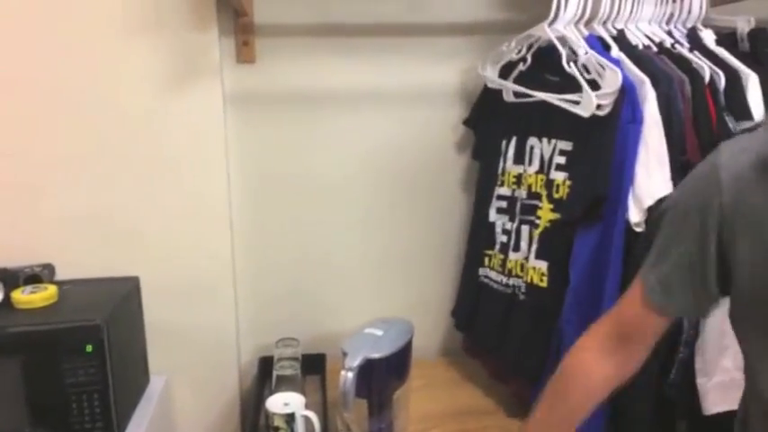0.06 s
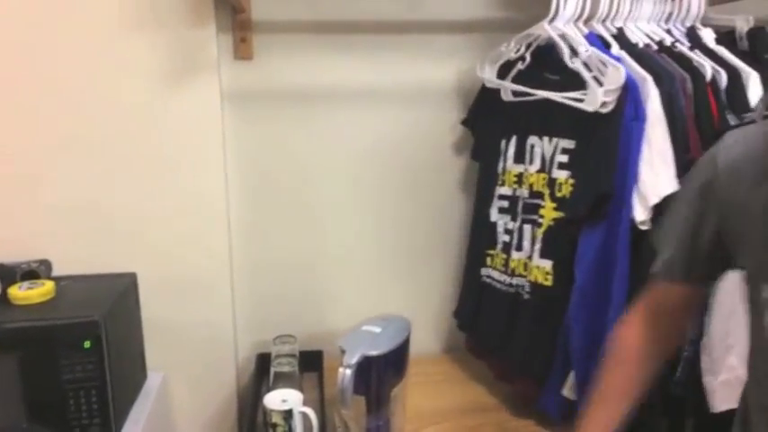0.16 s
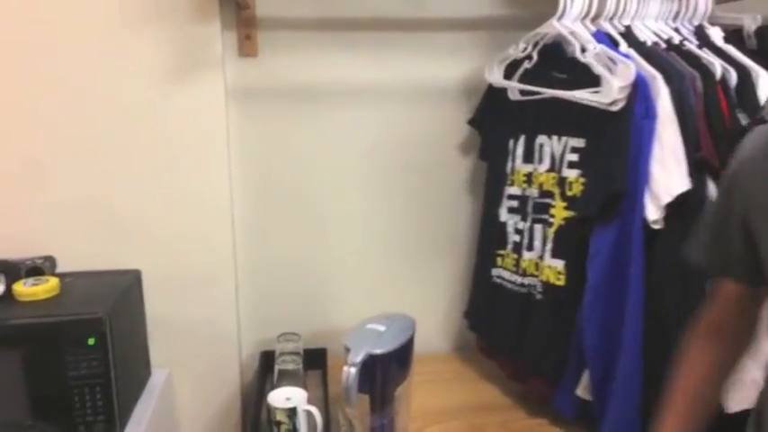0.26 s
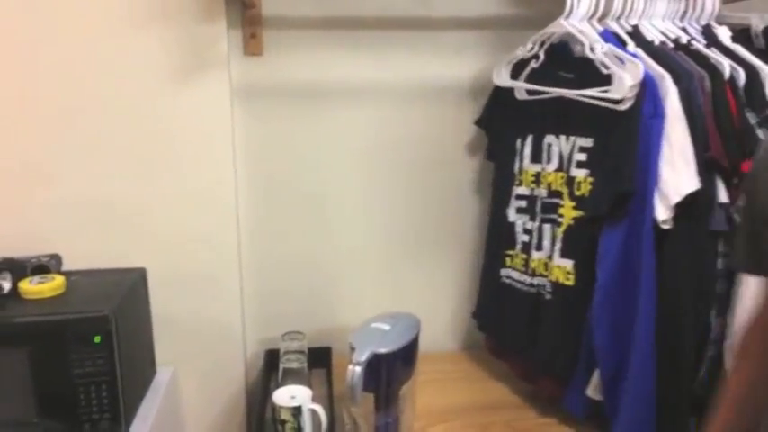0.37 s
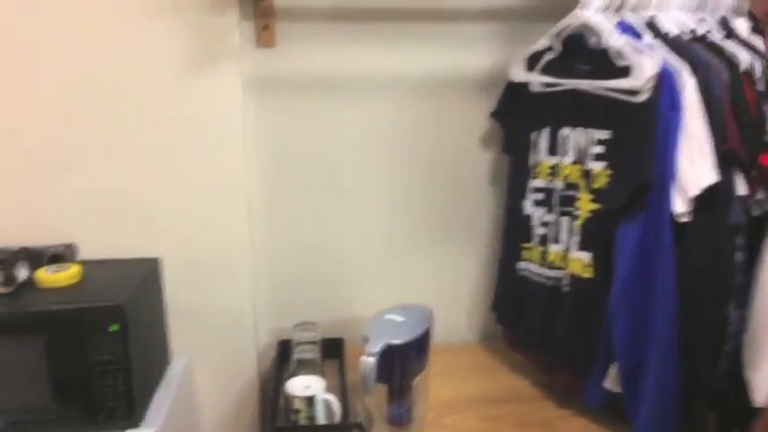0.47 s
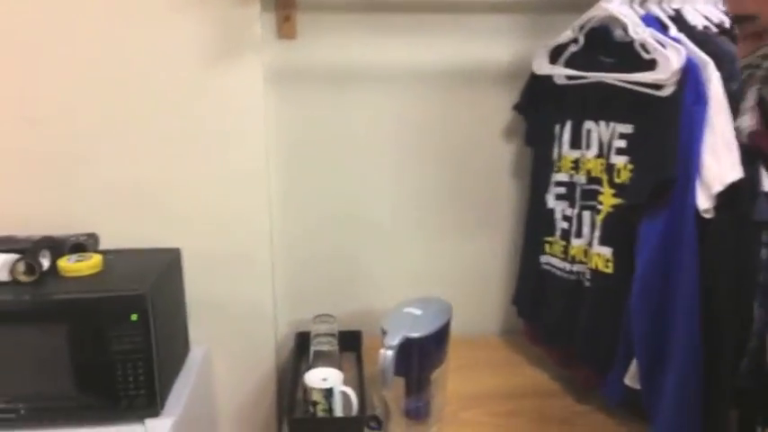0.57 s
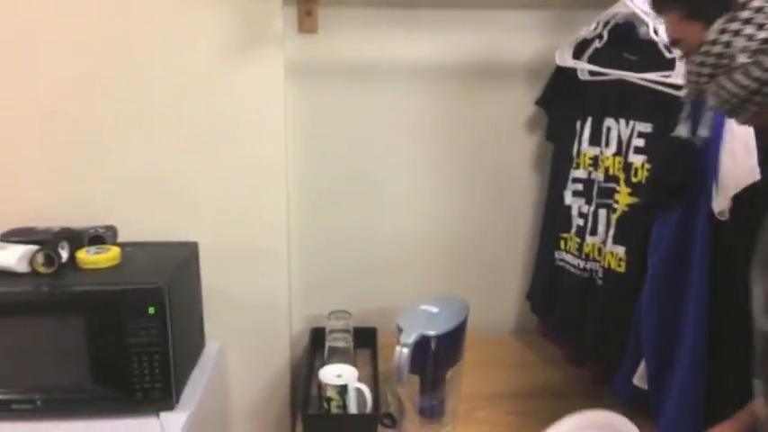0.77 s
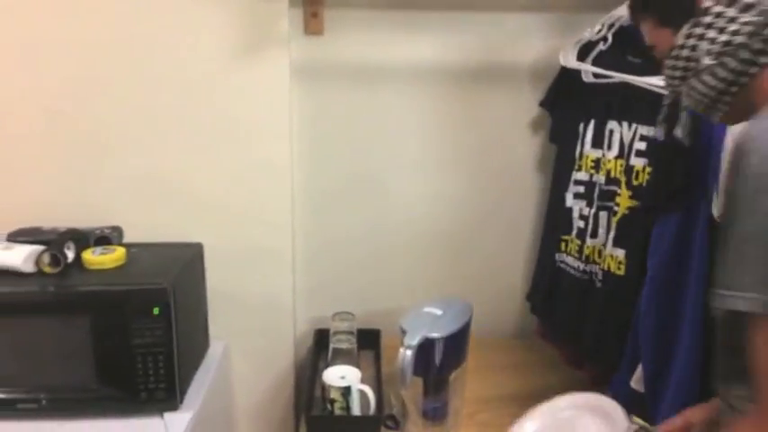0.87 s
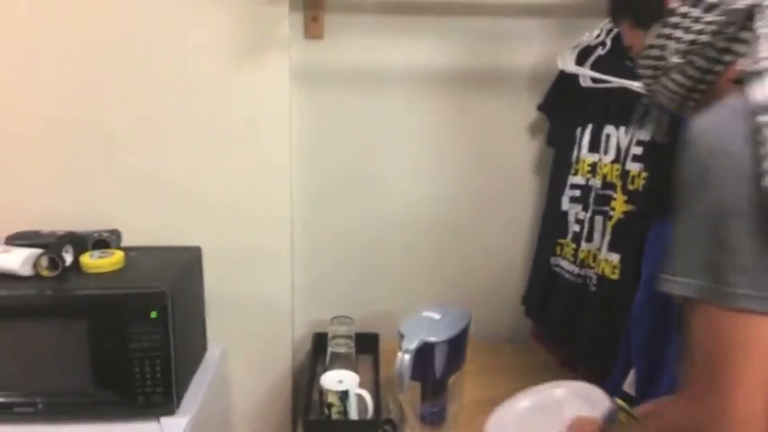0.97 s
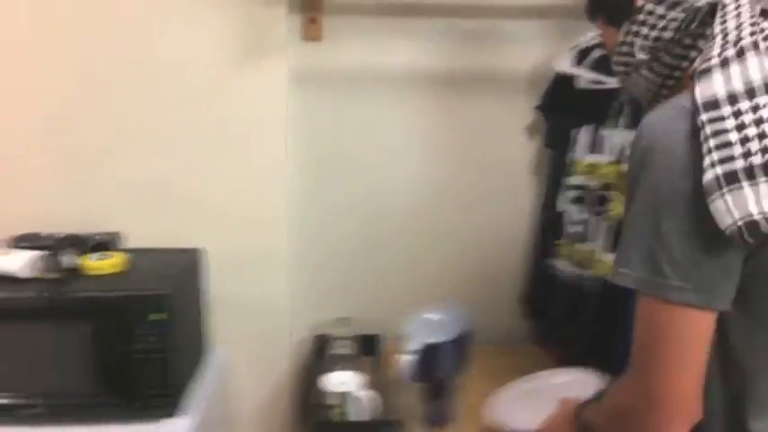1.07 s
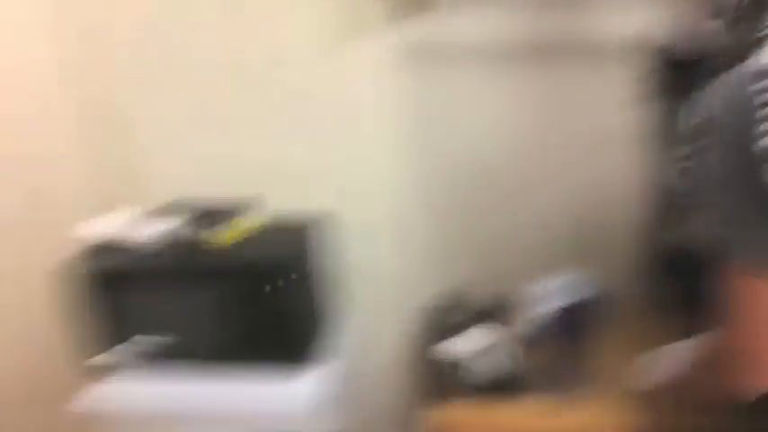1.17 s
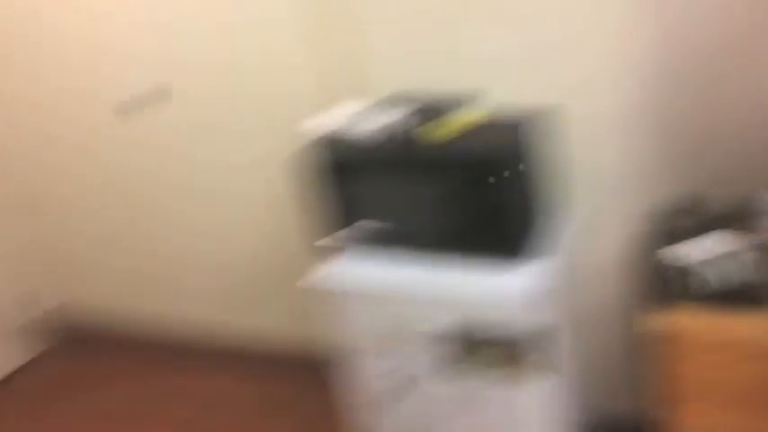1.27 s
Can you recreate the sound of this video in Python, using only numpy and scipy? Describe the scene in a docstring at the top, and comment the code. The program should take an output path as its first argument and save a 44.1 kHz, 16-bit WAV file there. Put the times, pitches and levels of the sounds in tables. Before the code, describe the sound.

Hangers pushed aside on a closet rod: bright clatter, a hollow wooden knock, then fading ticks

```python
"""Plastic clothes hangers are pushed aside on a metal closet rod, heard from across a small, live room.
A steady low rumble (filtered noise) lies underneath, and hooks slide faintly (bursts of tiny slips).
The hooks clack and chatter on the rod and the plastic shoulders bump (filtered clicks, ringing metal).
After more bright scraping, something wooden takes a hollow knock (softened clicks, ringing wood),
while the hangers rattle; then they settle with fainter ticks and slides."""
import sys
import numpy as np
from scipy import signal
from scipy.fft import rfft, irfft
from scipy.io import wavfile

SR = 44100
rng = np.random.default_rng(int(sys.argv[2]) if len(sys.argv) > 2 else 0)


def materialize(psi):
    """Save the field psi as 16-bit PCM at rate SR to the path in sys.argv[1].

    A 1-D psi becomes a single channel; in a 2-D psi each row is a channel.
    """
    bounded = np.clip(np.atleast_2d(psi).T, -1, 1)
    quanta = np.round(bounded * 32767).astype(np.int16)
    wavfile.write(sys.argv[1], SR, quanta)


N = 57330  # length in samples, 1.3 s
T = np.arange(N) / SR  # time in seconds


def from_db(db):
    """Turn decibels into a factor that multiplies the sound."""
    return 10 ** (np.asarray(db) / 20)


def at_hz(points, hz):
    """Read every column of a table at the given frequencies, on a log-frequency axis."""
    known, *columns = np.transpose(points)
    log_hz = np.log(np.maximum(hz, 1))
    return [np.interp(log_hz, np.log(known), column) for column in columns]


def convolve(x, response):
    """Start a copy of the response at every sample of x, scaled by that sample, and add them up."""
    return signal.fftconvolve(x, response)[:N]


def unit_energy(x):
    """Scale a sound so that its squared samples add up to one."""
    return x / np.sqrt(np.sum(x ** 2) + 1e-20)


def decay(t60):
    """Fade that loses 60 dB in t60 seconds."""
    return np.exp(-np.log(1000) * T / max(t60, 1e-3))


def coloured(x, colour, size=16384):
    """Filter a sound to a colour table, with a unit-energy response that never starts early."""
    db, = at_hz(colour, np.arange(size // 2 + 1) * SR / size)
    # keeping one side of the cepstrum gives minimum phase: energy comes as early as possible
    cepstrum = irfft(np.log(from_db(db)))
    spectrum = np.exp(rfft(2 * cepstrum[:size // 2], size))
    return convolve(x, unit_energy(irfft(spectrum)))


def clicks(rows):
    """One single-sample impulse for each (time [s], strength [dB]) row."""
    out = np.zeros(N)
    for time_s, db in rows:
        out[int(time_s * SR)] += from_db(db)
    return out


def ringing(modes, swell_s):
    """Vibrations of a solid body: sine waves that swell briefly and die away."""
    rings = np.zeros(N)
    for hz, db, t60 in modes:
        tone = np.sin(2 * np.pi * (hz * T + rng.random()))
        rings += from_db(db) * decay(t60) * tone
    return rings * (1 - np.exp(-T / swell_s))


def room_envelopes(count=14):
    """Split the room into bands: each reflects a range of pitches that builds up, then dies away."""
    # room echo: (frequency [Hz], t60 of main decay [s], t60 of lingering tail [s],
    # tail level relative to main decay [dB], build-up time [s])
    room_table = [(80, 0.27, 0.8, -30.5, 0.028), (250, 0.37, 1.1, -17.5, 0.0084),
                  (640, 0.38, 1.62, -16, 0.0076), (1166, 0.28, 1.02, -14.5, 0.0049),
                  (2160, 0.34, 1.03, -23.5, 0.00033), (4000, .33, 1.1, -17.5, 0.00033),
                  (6430, .32, 1.2, -26, 0.00058), (10000, 0.3, 0.71, -20, 0.00033),
                  (12500, .29, .55, -18, 0.00055), (15200, 0.21, .4, -25.5, .001)]
    hz = np.arange(N // 2 + 1) * SR / N
    centres = np.geomspace(80, 15000, count)
    windows = np.array([np.interp(hz, centres, pick) for pick in np.eye(count)])
    envelopes = []
    for t60, tail_t60, tail_db, build_s in zip(*at_hz(room_table, centres)):
        fade = decay(t60) + from_db(tail_db) * decay(tail_t60)
        envelopes.append(fade * (1 - np.exp(-T / build_s)))
    return windows.astype("f4"), np.array(envelopes, "f4")


def reflections(x, room):
    """Dense reflections: fading noise stands for countless echoes, drawn anew for each spot."""
    windows, envelopes = room
    noise = rng.standard_normal(N).astype("f4")
    bands = irfft(rfft(noise) * windows, N)
    return convolve(x, unit_energy(np.sum(bands * envelopes, axis=0)))


def in_room(x, room, room_db):
    """Direct sound plus its reflections."""
    return x + from_db(room_db) * reflections(x, room)


def contacts(rows, colour, room, room_db, count):
    """Contacts dealt in turn to several spots, each with its own reflections."""
    spots = [in_room(clicks(rows[k::count]), room, room_db) for k in range(count)]
    return coloured(sum(spots), colour)


def room_rumble():
    """Steady low background: random noise filtered so that the lows are strongest."""
    # rumble colour: (frequency [Hz], level [dB])
    floor_colour = [(20, -30), (45, -11), (70, 3), (100, -2.5), (160, -7.5), (245, -1.5), (350, -17.5),
                    (600, -25), (1200, -24.5), (2500, -32), (5000, -42.5), (15000, -55)]
    floor_db = -49
    return from_db(floor_db) * coloured(rng.standard_normal(N), floor_colour)


def hook_slides(room):
    """Hooks rub along the rod: dense tiny slips make a bright scrape with one broad squeal."""
    # slides: (start [s], length [s], attack [s], strength [dB], squeal pitch [Hz],
    # squeal level relative to scrape [dB], reflections level [dB])
    slides = [(0.0, 0.0075, 0.00097, -41.5, 3740, -2, 4.5), (0.176, .04, 0.018, -44.5, 3040, 10, 7),
              (0.587, 0.023, 0.0061, -2, 11300, -1.5, 4.5), (0.616, .003, 0.0011, -15, 11800, -9, -9),
              (0.6237, .002, 0.00058, -10, 5700, 8.5, 0), (0.6253, .003, .001, -1, 6150, -6, -3.5),
              (0.932, 0.0083, 0.0026, -18.5, 9250, 0, 4.5), (1.017, 0.013, 0.0082, -22.5, 6300, 8.5, 5.5),
              (1.032, .055, .004, -29.5, 6600, 0, 6.5), (1.264, .005, .002, -34.5, 10300, -4.5, -1.5)]
    # scrape colour: (frequency [Hz], level [dB])
    slide_colour = [(300, -12), (1200, -11.5), (2400, -3.5), (3200, -1), (5000, -4.5), (7000, 4),
                    (9300, 0.5), (13000, -1), (15000, -3)]
    slips_per_s, slip_spread_db, squeal_width_hz = 4600, 5, 1470
    direct, sent = np.zeros(N), np.zeros(N)
    for start, length, attack_s, db, squeal_hz, squeal_db, room_db in slides:
        stroke = np.clip((T - start) / attack_s, 0, 1) * (T < start + length)
        slip_here = rng.random(N) < slips_per_s / SR
        slip_size = from_db(slip_spread_db * rng.standard_normal(N))
        slips = slip_here * slip_size * rng.choice([-1, 1], N)
        scrape = coloured(stroke * slips, slide_colour)
        peak = signal.iirpeak(squeal_hz, squeal_hz / squeal_width_hz, fs=SR)
        squeal = signal.lfilter(*peak, scrape)
        slide = from_db(db) * (unit_energy(scrape) + from_db(squeal_db) * unit_energy(squeal))
        direct += slide
        sent += from_db(room_db) * slide
    return direct + reflections(sent, room)


def hanger_rattle(room):
    """Filtered clicks: light ticks as hangers swing and settle, and duller bumps of the shoulders."""
    # light ticks: (time [s], strength [dB])
    tick_rows = [(0.193, -43.5), (0.5953, -12), (0.6015, -18.5), (0.645, -8), (0.657, -10), (0.674, -7),
                 (0.683, -21), (0.711, -19.5), (0.737, -16.5), (0.764, -19), (0.876, -31), (0.8955, -26.5),
                 (0.9375, -23), (0.972, -24), (0.999, -23), (1.032, -27), (1.061, -44)]
    # tick colour: (frequency [Hz], level [dB])
    tick_colour = [(300, -6.5), (1500, 0), (2600, -9), (4000, 0), (4800, 0.5), (6300, 5), (8000, 1),
                   (10700, 0.5), (13000, -3.5), (15000, -6.5)]
    # plastic shoulders bump each other: (time [s], strength [dB])
    bump_rows = [(0.325, -8.5), (0.336, -7.5), (0.35, -17)]
    # bump colour: (frequency [Hz], level [dB])
    bump_colour = [(70, -6), (150, 2.5), (400, 1), (800, -9), (1500, -2.5), (2500, -0.5), (3100, 11),
                   (3900, -8.5), (8000, -12), (11000, 4), (15000, -18)]
    ticks = contacts(tick_rows, tick_colour, room, room_db=11, count=4)
    bumps = contacts(bump_rows, bump_colour, room, room_db=6.5, count=2)
    return ticks + bumps


def hook_clacks(room):
    """Hooks hit the rod in quick succession; the metal's ringing swells from the first hit."""
    # hooks clack on the rod: (time [s], strength [dB])
    clack_rows = [(0.2167, 1), (0.2195, -0.5), (0.2228, 2), (0.2325, 3.5), (0.2385, 4.5), (0.2465, 4),
                  (0.2545, -1.5), (0.276, -9), (0.331, -2), (0.341, -11.5), (0.3565, -28)]
    # clack colour: (frequency [Hz], level [dB])
    clack_colour = [(100, -44), (280, -72), (450, -27), (700, -19.5), (850, -21), (1070, -14),
                    (1280, -20.5), (1500, -13.5), (2100, -14), (2700, -12.5), (4300, -8), (5700, 0.5),
                    (7200, -4.5), (9300, -1.5), (12500, -5.5), (15000, -5.5)]
    # ringing of hook and rod: (frequency [Hz], level relative to the first hit [dB], t60 [s])
    hook_modes = [(5290, -28, .3), (5500, -29, .35), (5771, -21, .36), (5808, -30, .6), (6232, -27, .3),
                  (6766, -29, .42), (7597, -28, .3), (9149, -26, .33)]
    rod = convolve(clicks(clack_rows[:1]), ringing(hook_modes, swell_s=0.02))
    return contacts(clack_rows, clack_colour, room, room_db=12, count=7) + rod


def hollow_knock(room):
    """Four quick contacts, each softened by a low-pass; the strongest sets the wood ringing."""
    # contacts of the knock: (time [s], strength [dB], contact cut-off [Hz])
    knocks = [(0.6340, 0, 4940), (0.6360, 6.5, 2580), (0.6426, -2, 2150), (0.6639, 7, 1340)]
    # knock colour: (frequency [Hz], level [dB])
    knock_colour = [(40, -13), (80, 5.5), (130, 2), (330, 1.5), (550, -4.5), (780, -4), (950, 1), (1350, 3),
                    (1800, 0.5), (2150, -1), (2500, -8), (4000, -10.5), (8000, -18.5)]
    # long ringing of the wood: (frequency [Hz], level [dB], t60 [s])
    knock_modes = [(228.6, -16, .42), (260, -27, .5), (364, -22, .3), (449, -22, .7), (568, -30, 1.25),
                   (592, -35, 1.15), (695, -32, .85), (884, -25, .4), (925, -22, .48), (961, -26, .55),
                   (1156, -29, .62), (1302, -19, .3), (1536, -27, .48), (1757, -22, .3)]
    # short snap of the strongest contact: (frequency [Hz], level [dB], t60 [s])
    knock_snap = [(1810, -0.5, 0.0074)]
    force = np.zeros(N)
    for time_s, db, cut_hz in knocks:
        soften = signal.butter(2, cut_hz, fs=SR, output="sos")
        force += signal.sosfilt(soften, in_room(clicks([(time_s, db)]), room, room_db=10))
    blow_s = max(knocks, key=lambda row: row[1])[0]
    wood = ringing(knock_modes, swell_s=0.019) + ringing(knock_snap, swell_s=0.00027)
    return coloured(force, knock_colour) + convolve(clicks([(blow_s, 0)]), wood)


def gain_control(x):
    """Automatic gain: lifts quiet sound, drops quickly for loud sound and creeps back."""
    lift_db, threshold_db, recover_db_per_s = 4.5, -21.5, 5
    squeeze = 0.64  # dB of gain lost per dB above the threshold
    sense_s = 0.006  # smoothing time of the sensed level
    keep = np.exp(-1 / (sense_s * SR))
    power = signal.lfilter([1 - keep], [1, -keep], x ** 2)
    level_db = 10 * np.log10(power + 1e-12)
    excess_db = squeeze * np.maximum(level_db - threshold_db, 0)
    # hold the largest reduction so far, less what has recovered since
    recovery_db = recover_db_per_s * T
    held_db = np.maximum.accumulate(excess_db + recovery_db, axis=-1) - recovery_db
    return x * from_db(lift_db - held_db)


def scene():
    """All sources at one microphone."""
    room = room_envelopes()
    hangers = hook_slides(room) + hanger_rattle(room) + hook_clacks(room)
    return (room_rumble() + hangers + hollow_knock(room))[None]


def record(dry):
    """Automatic gain, rounded peaks, and a steep cut of the highest treble."""
    rounded = np.tanh(gain_control(dry))
    top_cut = signal.ellip(12, .2, 80, 15250, fs=SR, output="sos")  # cut-off 15250 Hz
    return signal.sosfilt(top_cut, rounded)


dry = scene()
out = record(dry)
materialize(out)
```